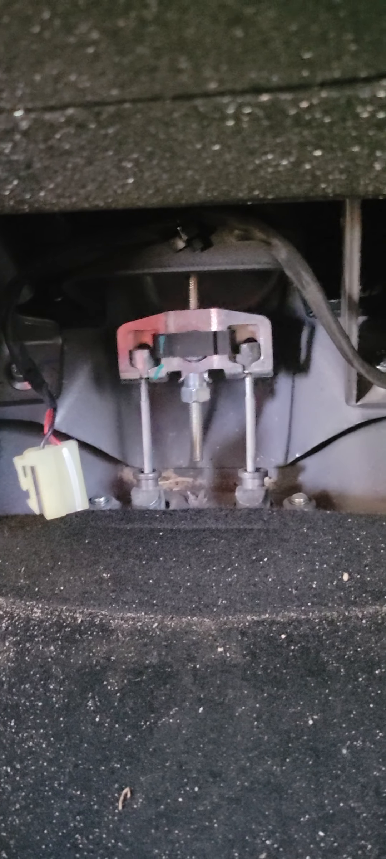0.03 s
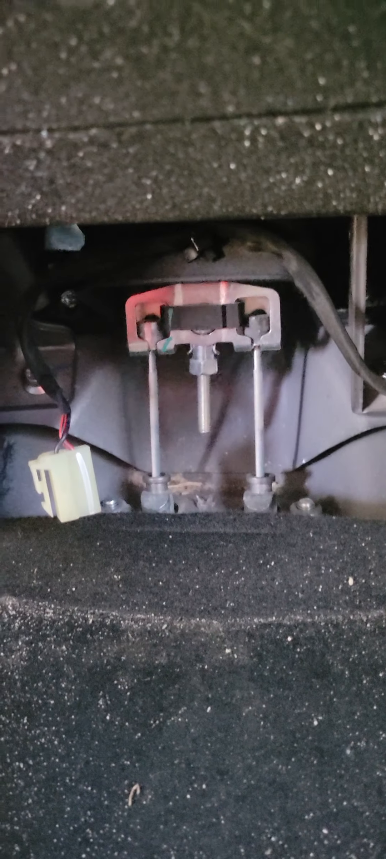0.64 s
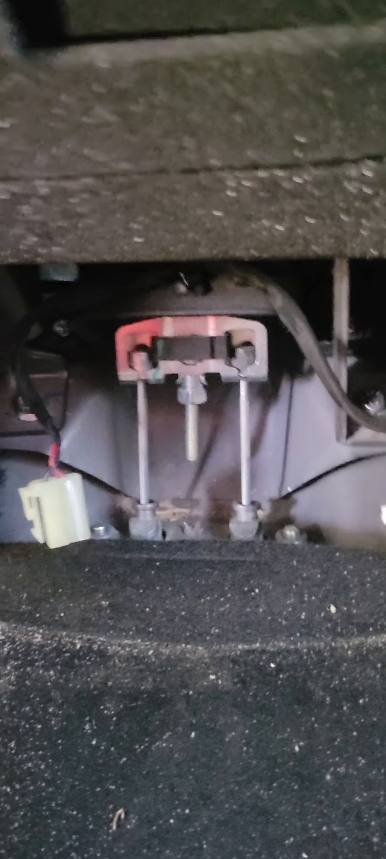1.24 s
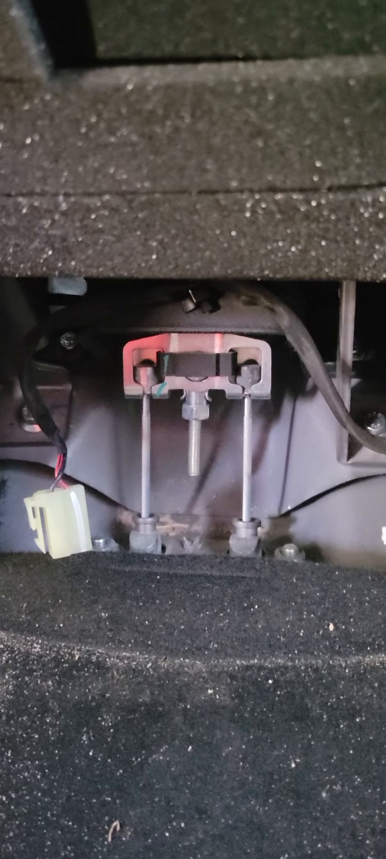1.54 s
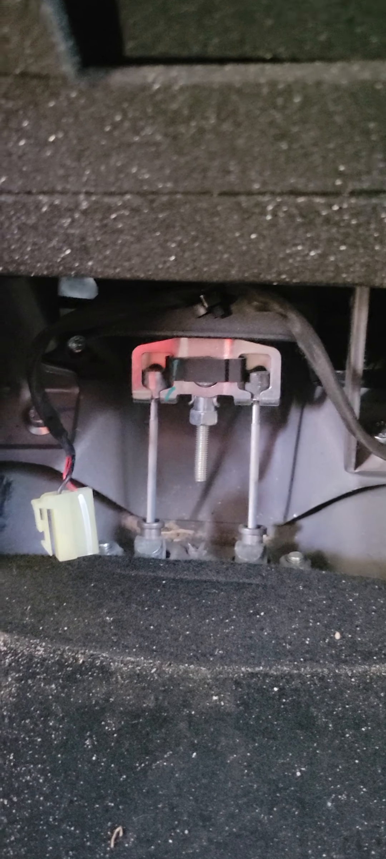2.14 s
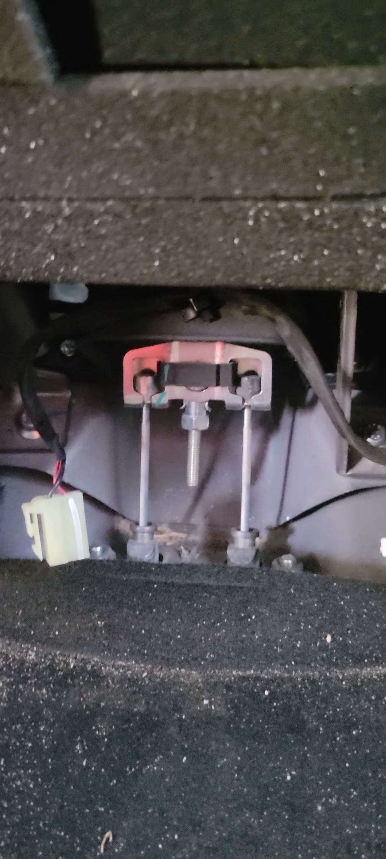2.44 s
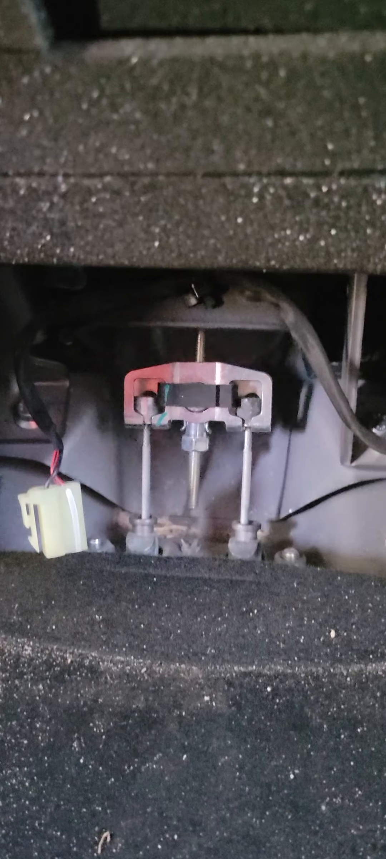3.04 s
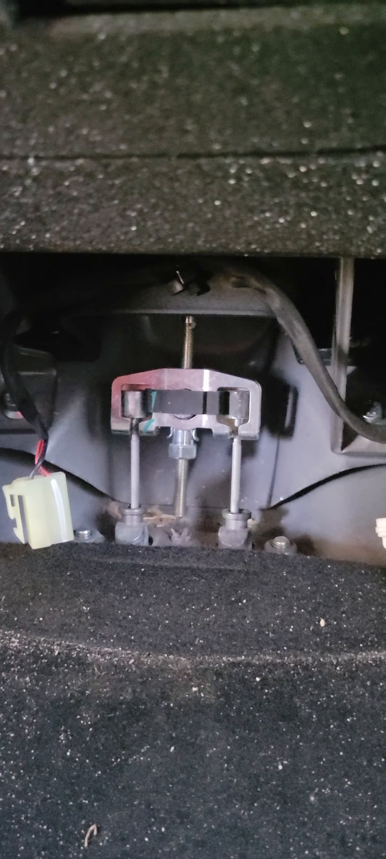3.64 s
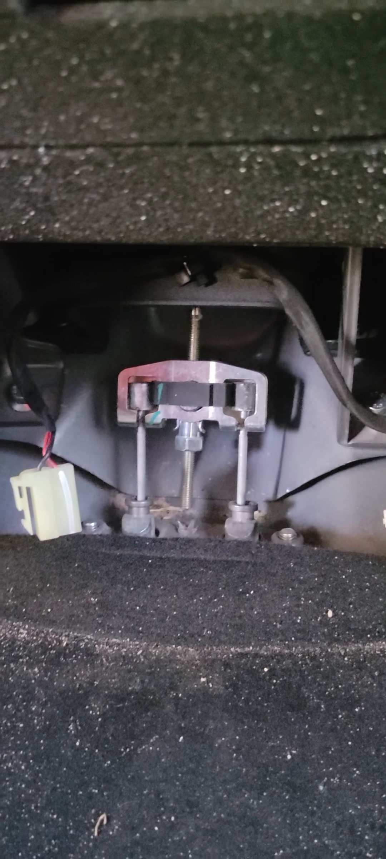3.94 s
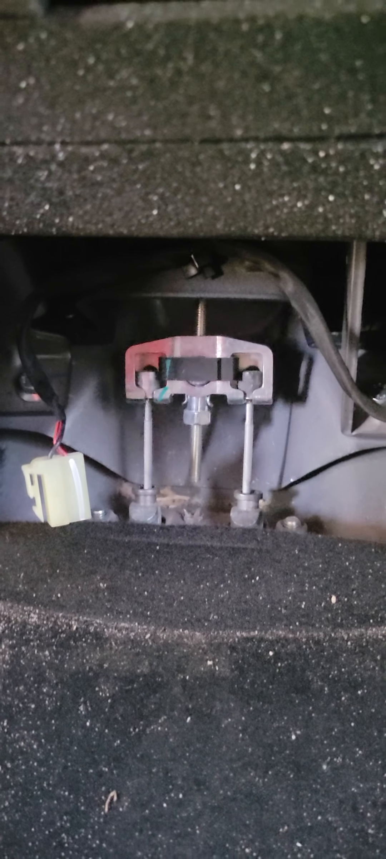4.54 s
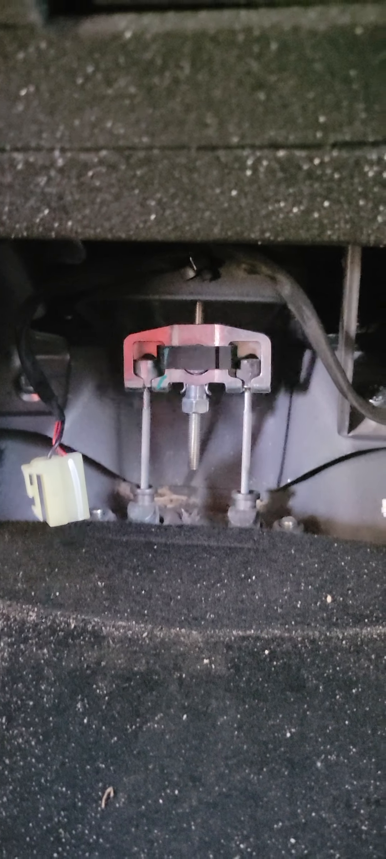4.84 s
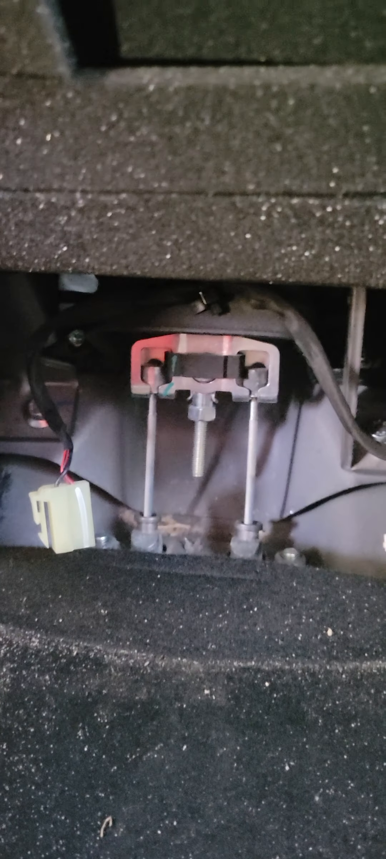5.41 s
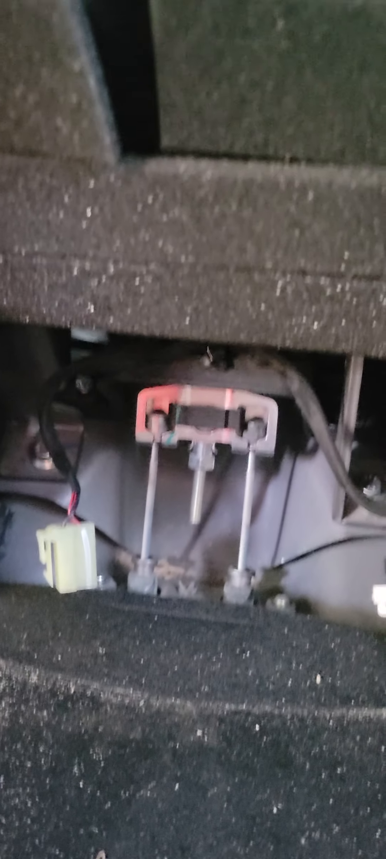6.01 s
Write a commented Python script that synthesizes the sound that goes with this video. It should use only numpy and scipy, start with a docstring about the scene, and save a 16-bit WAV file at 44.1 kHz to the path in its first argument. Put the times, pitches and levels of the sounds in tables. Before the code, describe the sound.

A car handbrake is worked twice up close, with sharp ratchet clicks, booming clunks and scraping cables over a soft hiss.

```python
"""Working a car handbrake

A handbrake is worked twice, heard close up. Its catch (the pawl) clicks over steel teeth, the lever
drops back with a clunk, and the cables slide, creak and squeal in their sleeves. Every blow booms in
the car's floor. Behind it lie a soft hiss, a low hum, a thin steady whine and faint far chirps."""
import sys
import numpy as np
from scipy import signal
from scipy.fft import rfft, irfft, next_fast_len
from scipy.io import wavfile
from scipy.ndimage import uniform_filter1d, map_coordinates

SR = 44100
rng = np.random.default_rng(int(sys.argv[2]) if len(sys.argv) > 2 else 0)


def store_pcm(level_fs):
    """Save levels as 16-bit WAV."""
    pcm = np.round(np.clip(level_fs, -1, 1) * 32767).astype(np.int16)
    wavfile.write(sys.argv[1], SR, np.atleast_2d(pcm).T)


N = 276507
TIME = np.arange(N) / SR
AGE = np.arange(SR // 2) / SR  # seconds since a blow
SIDES = np.array([[.5], [-.5]])  # splits a difference between left and right

# each click's base levels (time [s], snap [dB], jolt to bracket and floor [dB], sizzle [dB])
CLICKS = [(0.373, -30.5, -32.5, -42), (.438, -28, -27, -24.5), (.496, -31, -27.5, -34),
          (.548, -29.5, -20.5, -21), (0.6, -26, -20.5, -14.5), (.648, -25.5, -21.5, -18.5),
          (.693, -30, -28, -22), (.772, -32.5, -37.5, -16.5), (4.418, -53, -43, -35.5),
          (4.4866, -50, -41, -30), (4.5209, -41, -41, -18), (4.594, -18.5, -19, -16.5),
          (5.013, -48, -41, -37), (5.093, -44, -35, -48), (5.125, -24, -24.5, -19),
          (5.1601, -24, -20.5, -17.5), (5.2058, -21, -22, -16)]
# tone colours of a click's three noises (frequency [Hz], level [dB])
CRACK_COLOUR = [(400, -21), (1200, -1), (5500, -11), (8500, 1), (15000, 11)]
SNAP_COLOUR = [(1500, -45), (2800, -2), (3450, 10.5), (3950, 7), (4800, 10), (5400, 12.5), (6300, 1.5),
               (7500, 1.5), (8600, -34), (12000, -33)]
SIZZLE_COLOUR = [(5000, -19), (9000, -5.5), (10500, -10), (12500, -6), (15000, -1.5), (16000, -0.5)]
# notes of the toothed steel plate (pitch [Hz], level [dB], fade time [s])
STEEL_NOTES = [(1767, 4, 0.046), (2600, -5, 0.096), (3280, 5.5, 0.071), (4220, -18, 0.1), (4920, 26, 0.017),
               (5610, 3, 0.026), (5480, -55, 0.056), (5770, 20, 0.04), (6540, 5, 0.024), (7200, -25, 0.074),
               (7680, -2, .045), (7160, 14, 0.038)]
# ringing bands of the bracket (pitch [Hz], width [Hz], level [dB])
BRACKET_BANDS = [(583, 47, -4.5), (900, 260, -10), (1224, 81, 2), (1388, 123, -5), (1820, 146, -7.5),
                 (2370, 190, -9)]
# a spring rings once near the end of the first pull (time [s], pitch [Hz], level [dB], fade time [s])
LAST_PING = (.773, 1860, -36, .06)
def ratchet():
    """The catch snaps into each tooth, rings the plate and its bracket, and jolts the floor."""
    out = np.zeros((2, N))
    for s, snap_db, jolt_db, sizzle_db in CLICKS:
        crack = burst(CRACK_COLOUR, rise=.0001, hold=.0005, t60=.006, tail_db=-50, tail_t60=.02)
        snap = burst(SNAP_COLOUR, rise=.00082, hold=.00093, t60=.028, tail_db=-14.5, tail_t60=.1)
        sizzle = burst(SIZZLE_COLOUR, rise=.0062, hold=.0027, t60=.016, tail_db=-22, tail_t60=.069)
        steel = [ring(STEEL_NOTES, scatter_db=2, detune=.0084, rise=.00074) for side in range(2)]
        add(out, s + .001, snap_db - 5.5, crack)
        add(out, s, snap_db + .5, snap)
        add(out, s, sizzle_db - 2, sizzle)
        add(out, s, snap_db - .5, np.array(steel))
        # each tooth rings the bracket a little differently
        bracket = [(hz, width, db + 2.5 * rng.standard_normal()) for hz, width, db in BRACKET_BANDS]
        add(out, s, jolt_db + .5, struck(bracket, hold=.00085, t60=.031, tail_db=-11.5))
        add(out, s, jolt_db + 1.6, floor_boom(db_per_octave=1.5, damping=1.01))
    s, hz, db, t60 = LAST_PING
    add(out, s, db, ring([(hz, 0, t60)], scatter_db=0, detune=0, rise=.001))
    return out


# each knock's base levels (time [s], floor boom [dB], panel thud [dB], clack [dB], steel edge [dB])
LEVER_KNOCKS = [(0.81, -42, -39.5, -52, -63), (1.031, -28, -35, -44, -51), (1.773, -38.5, -47.5, -57, -60),
                (2.282, -14, -18.5, -22.5, -26.5), (2.5, -34.5, -65, -64, -64),
                (2.817, -44, -49, -58.5, -52), (3.313, -37, -58, -72, -66), (3.595, -22, -43.5, -34.5, -58),
                (3.93, -28.5, -40.5, -59, -68), (4.355, -23.5, -41, -32, -52),
                (4.387, -50, -38, -36.5, -55), (4.525, -19.5, -36.5, -45, -53),
                (4.593, -31, -22.5, -30, -31), (5.421, -24.5, -32, -36, -36)]
# light taps of the slack linkage (time [s], base level [dB])
SLACK_TICKS = [(.25, -51.5), (1.343, -52), (1.471, -57.5), (1.93, -59), (3.512, -54.5), (4.055, -55.5),
               (5.623, -56), (5.714, -52.5), (6.122, -52)]
# ringing bands of the floor panel and the yoke (pitch [Hz], width [Hz], level [dB])
PANEL_BANDS = [(433, 18, 5.5), (545, 43, 8.5), (696, 77, 1), (803, 35, 4), (1063, 124, -2)]
YOKE_BANDS = [(1238, 80, 0), (1390, 65, 1), (1615, 260, -2.5), (1830, 128, 1.5), (2050, 108, -2),
              (2580, 89, -9.5), (3150, 230, -11.5)]
# a knock's bright steel edge (frequency [Hz], level [dB])
EDGE_COLOUR = [(1500, 3), (3600, 4), (6000, 6), (8500, -3), (12000, -8.5), (15500, -1.5)]
# the car body rocks when the lever is let go (time [s], level [dB])
BODY_ROCKS = [(1.034, -33), (2.283, -24), (3.929, -36.5), (5.424, -27.5)]
# deep notes of the car body (pitch [Hz], level [dB], fade time [s])
BODY_NOTES = [(31.2, 12, 0.42), (47, 9.5, 0.32), (74.6, 14, 0.29)]
def lever():
    """The lever and the yoke, which holds the cables, knock on their stops and rock the car."""
    out = np.zeros((2, N))
    taps = [(s, db + 5, db + 3, db, db + 2) for s, db in SLACK_TICKS]  # as tiny knocks
    for s, boom_db, thud_db, clack_db, edge_db in LEVER_KNOCKS + taps:
        rattle_db = min(-4 + .13 * (boom_db + 19), -3)  # heavy blows rattle on for longer
        add(out, s, thud_db - .5, struck(PANEL_BANDS, hold=.0022, t60=.013, tail_db=rattle_db))
        add(out, s, clack_db + 2, struck(YOKE_BANDS, hold=.0049, t60=.043, tail_db=rattle_db - 1))
        edge = burst(EDGE_COLOUR, rise=.0059, hold=.0041, t60=.042, tail_db=-18, tail_t60=.13)
        add(out, s, edge_db - 2, edge)
        add(out, s, boom_db - 2.14, floor_boom(db_per_octave=-4.5, damping=.79))
    for s, db in BODY_ROCKS:
        add(out, s, db, ring(BODY_NOTES, scatter_db=1, detune=.11, rise=.012))
    return out


# notes of the metal floor (pitch [Hz], base level [dB], base fade time [s])
FLOOR_NOTES = [(104.1, -20.5, 0.4), (130.4, -5.5, 0.14), (213, -3, 0.096), (258, 3.5, 0.066),
               (321.2, -5.5, 0.12)]
def floor_boom(db_per_octave, damping):
    """The floor booms like a drum: hard blows favour its high notes, soft ones its low notes."""
    lowest_hz = FLOOR_NOTES[0][0]
    notes = [(hz, db + db_per_octave * np.log2(hz / lowest_hz), t60 / damping)
             for hz, db, t60 in FLOOR_NOTES]
    return ring(notes, scatter_db=2, detune=.035, rise=.003)


# pulls on the lever (start [s], hardest moment [s], end [s], drag [dB], hiss [dB])
LEVER_PULLS = [(0.025, 0.647, .83, -38, -46.5), (4.398, 4.53, 4.63, -36, -49),
               (4.86, 5.111, 5.28, -31.5, -52)]
# tone colours of a moving cable (frequency [Hz], level [dB])
RUMBLE_COLOUR = [(40, -10), (90, -8.5), (125, 6.5), (175, 0), (250, -2.5), (340, -8), (500, -14.5),
                 (1500, -70)]
SCRAPE_COLOUR = [(200, -18), (600, 5.5), (900, -3.5), (1230, 3), (1600, -2), (2400, -8), (3400, -10),
                 (5500, -14), (9000, -27)]
SLEEVE_COLOUR = [(1500, -7), (3000, 4), (5800, -2), (8500, -4), (10600, -9), (13000, -2), (15600, 0.5)]
def cable_drag():
    """The cables drag unevenly in their sleeves; rumble, scrape and hiss follow the pull's effort."""
    out = np.zeros((2, N))
    grip = amp(3.5 * wobble(220) + 2 * wobble(30))
    drag = noise(RUMBLE_COLOUR) + amp(-6.5) * noise(SCRAPE_COLOUR, strength=grip)
    hiss = noise(SLEEVE_COLOUR, strength=grip)
    for start, peak, end, drag_db, hiss_db in LEVER_PULLS:
        out += amp(drag_db) * stroke(start, peak, end, rise_db=17.5, fall_db=22) * drag
        out += amp(hiss_db) * stroke(start, peak, end, rise_db=17.5, fall_db=22, depth=.57) * hiss
    return out


# tone colours of the shudder and the grit (frequency [Hz], level [dB])
JUDDER_COLOUR = [(60, -19), (105, -6), (122, -7), (138, -8.5), (175, -18), (255, -16), (340, -29),
                 (2000, -46)]
GRIT_COLOUR = [(900, -35), (1350, 6.5), (1900, -12), (4800, -11), (6000, 3.5), (6900, -12), (7400, -6),
               (9300, -32), (10500, -4), (11500, -3.5), (12800, -4), (14800, 0), (15600, 4)]
def cable_slide(judder_hz=127):
    """Easing back, the cable shudders near a low note of the floor and rasps over fine grit."""
    motion = dict(start=2.84, peak=3.05, end=3.313, rise_db=7.5, fall_db=14)
    cycles = np.cumsum(judder_hz * np.exp(.07 * wobble(45))) / SR
    tone = amp(1.5 * wobble(35)) * np.sin(2 * np.pi * cycles)
    judder = tone + amp(-5) * noise(JUDDER_COLOUR)
    grains = amp(4 * wobble(420) + 1.8 * wobble(45))
    rasp = noise(GRIT_COLOUR, strength=grains)
    return amp(-35.5) * stroke(**motion) * judder + amp(-44.5) * stroke(**motion, depth=.94) * rasp


# tone colour of the creak (frequency [Hz], level [dB])
CREAK_COLOUR = [(150, -9), (500, -2.5), (850, -6), (1800, -5.5), (2200, -25), (5000, -41)]
def cable_creak(slip_hz=170):
    """Taking up load, the cable sticks and slips quickly; each slip is a tiny puff of noise."""
    slip_count = np.floor(np.cumsum(slip_hz * np.exp(.5 * wobble(90))) / SR)
    slips = np.diff(slip_count, prepend=0) * amp(1.5 * wobble(110))
    puffs = signal.fftconvolve(slips, np.exp(-AGE / .0025))[:N]
    load = stroke(start=4.832, peak=4.89, end=4.99, rise_db=6.5, fall_db=10)
    return amp(-39.5) * load * noise(CREAK_COLOUR, strength=puffs)


# ringing bands of the cable's strands (pitch [Hz], base width [Hz], level [dB])
STRAND_BANDS = [(5250, 440, 0), (10550, 140, 6), (11350, 300, -14), (15550, 390, -1)]
def cable_squeal():
    """Dry strands rub and sing thinly in a few high bands as the load grows."""
    def strands(hz):
        # squaring each band keeps the gaps between them quiet
        return sum(amp(db) * resonances([(pitch, 2 * width, 0)], hz) ** 2
                   for pitch, width, db in STRAND_BANDS)
    rub = rng.standard_normal((2, N)) * amp(7.1 * wobble(70))
    load = stroke(start=4.91, peak=5.14, end=5.14, rise_db=2.07, fall_db=0)
    return amp(-55.93) * load * unit(filtered(rub, strands))


# how alike left and right are (frequency [Hz], likeness [capped at 1])
HOLLOW_LIKENESS = [(60, .97), (150, 4), (320, 0.7), (600, -0.35), (1200, 0.99), (3000, -0.62),
                   (12000, 0.35)]
# how far the left wave runs ahead (frequency [Hz], lead [radians])
LEFT_LEAD = [(60, .1), (130, 0), (380, -.35), (850, 1.8), (1250, 2), (2000, 4.2), (4000, 4.5), (6000, 7),
             (10000, 11), (16000, 18)]
# how much louder the left is (frequency [Hz], left minus right [dB])
LEFT_LOUDER = [(60, -2.5), (300, -2.3), (600, -1.5), (1200, -4), (2000, 2.5), (4000, .8), (12000, 2.6)]
def hollow(sound):
    """The hollow under the trim sends the brake's sound differently to left and right."""
    def paths(hz):
        gain = amp(SIDES * along(LEFT_LOUDER, hz))
        return gain * np.exp(1j * SIDES * along(LEFT_LEAD, hz))
    return filtered(stereo(sound, HOLLOW_LIKENESS), paths)


# tone colour of the background hiss and rumble (frequency [Hz], level [dB])
AIR_COLOUR = [(20, -6.5), (48, 3), (85, -5), (115, -4.5), (165, -8), (330, -15), (600, -20.5), (1300, -21),
              (2000, -24), (3200, -19), (5000, -23.5), (7500, -24), (9000, -37), (15500, -34)]
# how alike its left and right are (frequency [Hz], likeness [-1 to 1])
AIR_LIKENESS = [(60, 0.97), (180, 0.8), (550, 0.54), (1650, -0.23), (4970, -0.22), (15000, -0.034)]
def hiss_and_hum():
    """Soft hiss and rumble with a low hum; their level dips briefly."""
    dip_db = -3.5 * np.exp(-((TIME - 4.1) / .64) ** 2)
    air_db = -50 - 2 * SIDES + dip_db + .27 * wobble(3.24)
    air = amp(air_db) * stereo(noise(AIR_COLOUR), AIR_LIKENESS)
    hum_colour = [(235, -81), (262, -11), (272, -4.5), (282, -17), (310, -59)]
    return air + amp(-61 + dip_db) * noise(hum_colour)[0]


# the whine's slow drift (time [s], pitch [Hz])
WHINE_DRIFT = [(0, 2707), (.8, 2720), (2.2, 2720), (2.6, 2709), (3.5, 2710), (3.9, 2719), (6.27, 2725)]
# the tones within it (multiple of the pitch, left [dB], right [dB])
WHINE_TONES = [(1, -63, -59.5), (2, -64.5, -67.5), (3, -74.5, -67)]
# steady tones beside it (pitch [Hz], level [dB])
SIDE_TONES = [(3144, -74.5), (3262, -69)]
def whine():
    """A thin far whine wavers separately left and right, beside two faint steady tones."""
    def waver(db):
        return amp(db + 2 * wobble(4.22) + 3.5 * wobble(18))
    pitch = np.interp(TIME, *np.transpose(WHINE_DRIFT)) + 1.79 * wobble(30)
    phase = 2 * np.pi * np.cumsum(pitch) / SR
    lowest, *overtones = [np.array([waver(left_db), waver(right_db)]) * np.sin(multiple * phase)
                          for multiple, left_db, right_db in WHINE_TONES]
    weakening = amp(-1.07 * (TIME - TIME.mean()))
    steady = sum(amp(db + .82 * wobble(3.7)) * np.sin(2 * np.pi * hz * TIME) for hz, db in SIDE_TONES)
    return weakening * lowest + sum(overtones) + steady


# far chirps (time of peak [s], pitch [Hz], base level [dB])
FAR_CHIRPS = [(.06, 4450, -62), (.88, 6200, -66), (1.47, 4700, -61), (1.52, 3950, -62), (2.39, 4700, -61),
              (2.45, 4000, -62), (3.46, 4700, -61), (3.51, 4050, -62), (4.02, 6050, -63), (4.34, 4650, -62),
              (5.82, 4300, -63)]
def chirps(swell_s=.06):
    """Far chirps, smeared by distance into short narrow puffs of noise."""
    out = np.zeros((2, N))
    swell = np.exp(-((AGE - swell_s) / .045) ** 2)
    for s, hz, db in FAR_CHIRPS:
        band = [(hz * .76, -50), (hz * .94, -3), (hz * 1.06, -3), (hz * 1.26, -50)]
        add(out, s - swell_s, db + 7, noise(band, len(AGE)) * swell)
    return out


def burst(colour, rise, hold, t60, tail_db, tail_t60):
    """Steel chatters briefly and leaves a weak tail in the cabin. t60: seconds to fade by 60 dB."""
    fall = amp(-60 * np.maximum(AGE - hold, 0) / t60)
    tail = amp(tail_db - 60 * AGE / tail_t60)
    return noise(colour, len(AGE)) * (1 - np.exp(-AGE / rise)) * (fall + tail)


def struck(bands, hold, t60, tail_db):
    """A short chatter of contacts makes a part ring in its own bands."""
    low, high = bands[0][0], bands[-1][0]
    colour = [(low / 2, -25), (low * 1.104, 0), (high * 1.83, 0), (high * 2, -25)]
    blow = burst(colour, rise=.00041, hold=hold, t60=t60, tail_db=tail_db, tail_t60=.11)
    return filtered(blow, lambda hz: resonances(bands, hz))


def ring(notes, scatter_db, detune, rise):
    """A struck part's fading notes, with slightly new strengths and pitches each time."""
    hz, db, t60 = np.transpose(notes)[:, :, None]
    level_shift, pitch_shift = rng.uniform(-1, 1, (2, len(notes), 1))
    fade = amp(db + scatter_db * level_shift - 60 * AGE / t60)
    swing = np.sin(2 * np.pi * hz * (1 + detune * pitch_shift) * AGE)
    return (1 - np.exp(-AGE / rise)) * np.sum(fade * swing, axis=0)


def resonances(bands, hz):
    """How a part with these ringing bands responds at each frequency."""
    return sum((-1) ** k * amp(db) * 1j * hz * width / (pitch ** 2 - hz ** 2 + 1j * hz * width)
               for k, (pitch, width, db) in enumerate(bands))


def stroke(start, peak, end, rise_db, fall_db, depth=1, fade_s=.0078):
    """A rub swells to 1 at its peak, eases off and stops; less depth flattens the swell."""
    effort_db = np.interp(TIME, [start, peak, end], [-rise_db, 0, -fall_db])
    moving = np.clip(np.minimum(TIME - start, end - TIME) / fade_s, 0, 1)
    return moving * amp(depth * effort_db)


def add(track, s, db, sound):
    """Mix in a sound at s seconds so that its loudest 4 ms have the level db."""
    power = uniform_filter1d(np.mean(np.atleast_2d(sound) ** 2, axis=0), size=176)
    slot = track[:, max(round(s * SR), 0):][:, :len(AGE)]
    slot += amp(db) * sound[..., :slot.shape[1]] / np.sqrt(power.max())


def noise(colour, size=N, strength=1):
    """Two unrelated noises of one tone colour; a changing strength makes them rough."""
    white = strength * rng.standard_normal((2, size))
    return unit(filtered(white, lambda hz: amp(along(colour, hz))))


def stereo(pair, likeness):
    """Blend two unrelated sounds into a left and right of the given likeness."""
    def shares(hz):
        angle = np.arccos(np.clip(along(likeness, hz), -1, 1)) / 2
        return np.array([np.cos(angle), np.sin(angle)])
    mid, side = filtered(pair, shares)
    return np.array([mid + side, mid - side])


def filtered(x, response):
    """Scale and shift each frequency in x by response(hz)."""
    size = x.shape[-1]
    padded = next_fast_len(size + SR // 8)
    hz = np.fft.rfftfreq(padded, 1 / SR)
    return irfft(rfft(x, padded) * response(hz), padded)[..., :size]


def wobble(rate):
    """A smooth curve through rate random values a second."""
    return map_coordinates(rng.standard_normal(int(N * rate / SR) + 4), [TIME * rate])


def along(points, hz):
    """Read between (frequency, value) points, with octaves evenly spaced."""
    frequencies, values = np.transpose(points)
    return np.interp(np.log(hz + 1), np.log(frequencies + 1), values)


def amp(db):
    """Turn decibels into a multiplier."""
    return 10 ** (np.asarray(db) / 20)


def unit(x):
    """Scale to an average power of 1."""
    return x / np.sqrt(np.mean(x ** 2) + 1e-20)


def scene():
    """The handbrake sounds out of its hollow, over the background."""
    brake = ratchet() + lever() + cable_drag() + cable_creak() + cable_squeal() + cable_slide()
    return hollow(brake) + hiss_and_hum() + whine() + chirps()


def record(dry):
    """Cut away the very highest treble."""
    top_hz = 15900
    return filtered(dry, lambda hz: 1 / (1 + (hz / top_hz) ** 160))


dry = scene()
out = record(dry)
store_pcm(out)
```